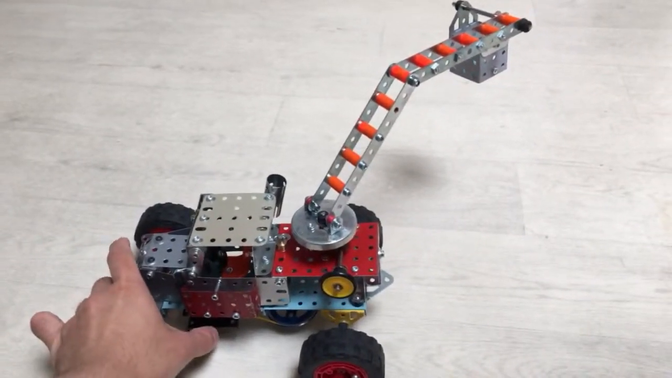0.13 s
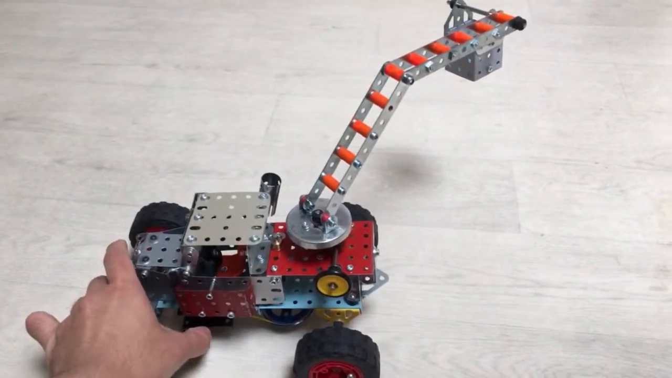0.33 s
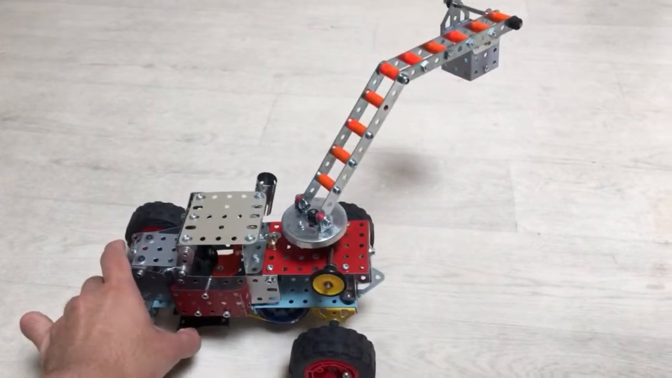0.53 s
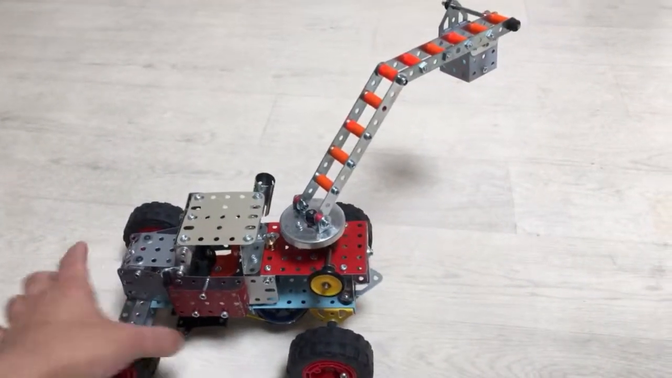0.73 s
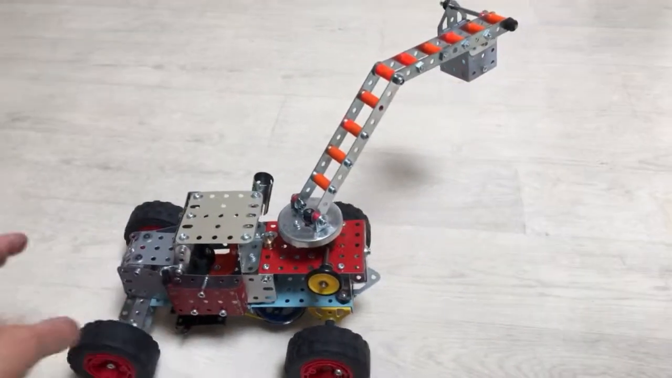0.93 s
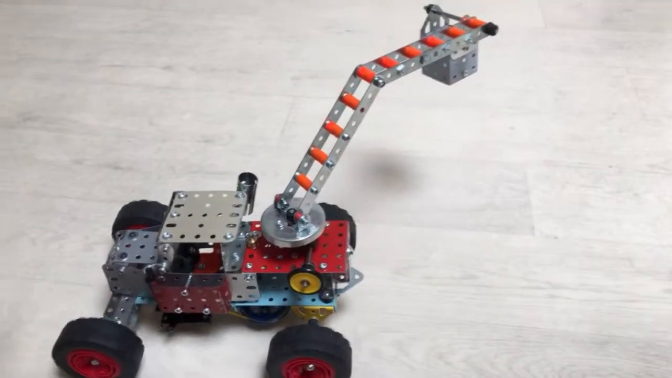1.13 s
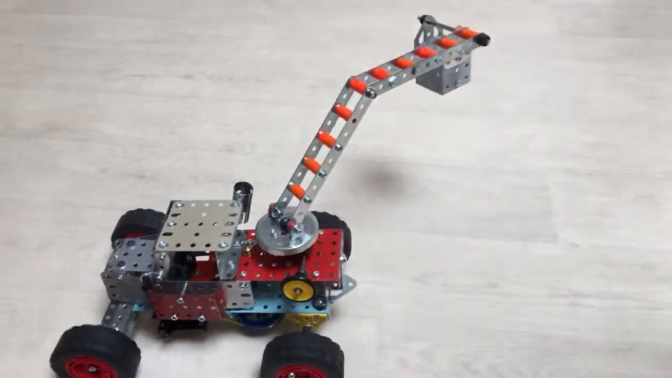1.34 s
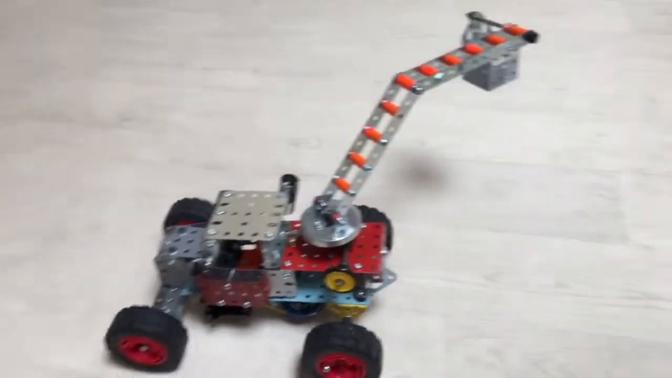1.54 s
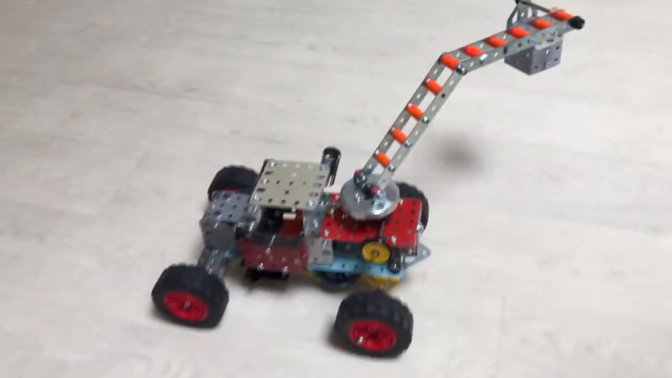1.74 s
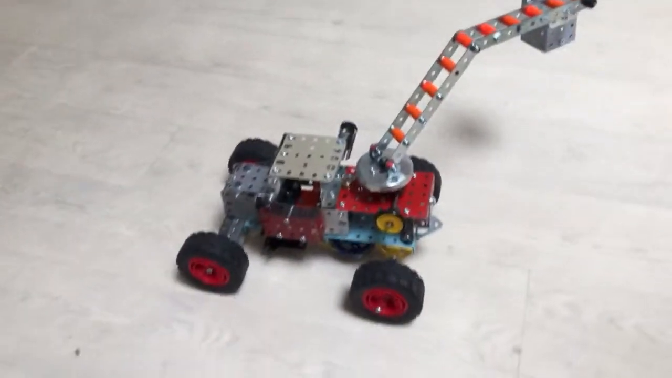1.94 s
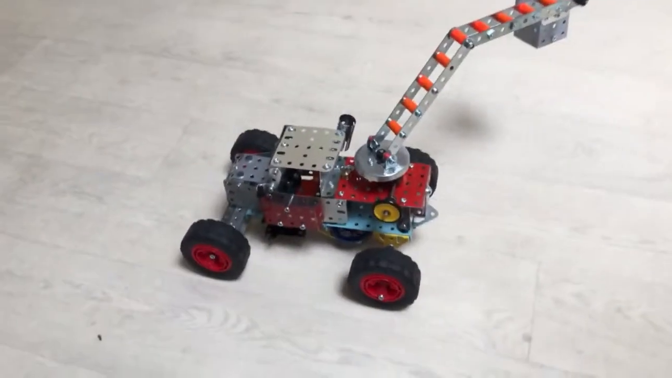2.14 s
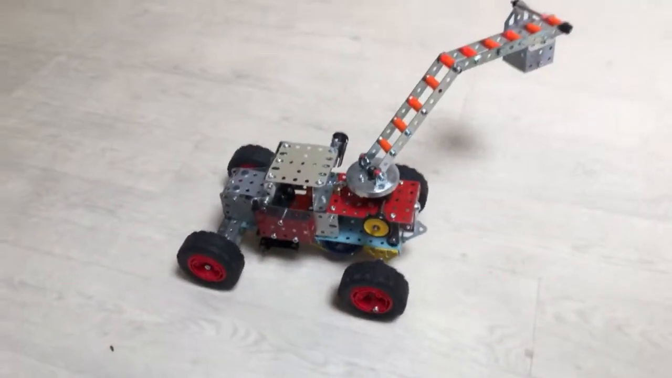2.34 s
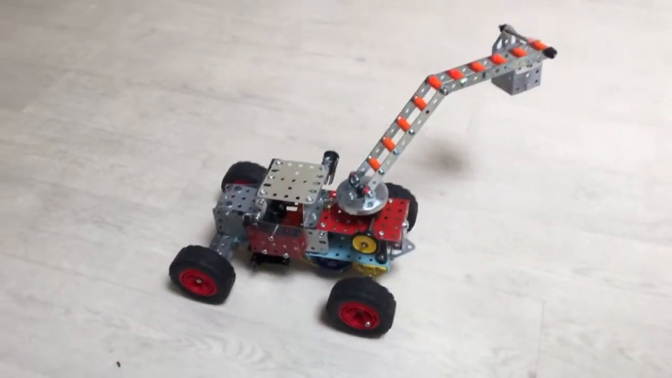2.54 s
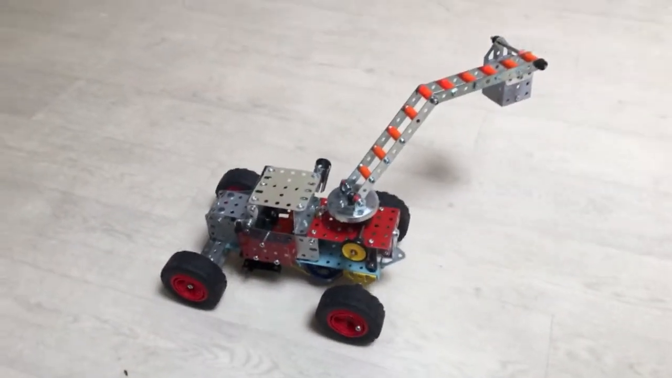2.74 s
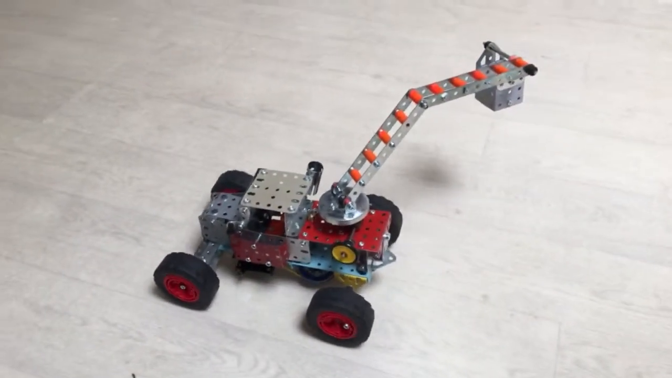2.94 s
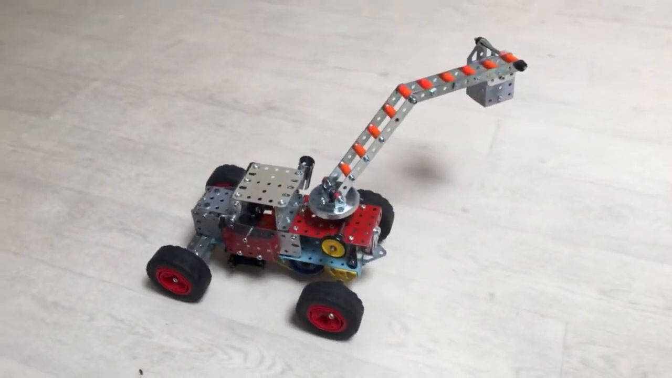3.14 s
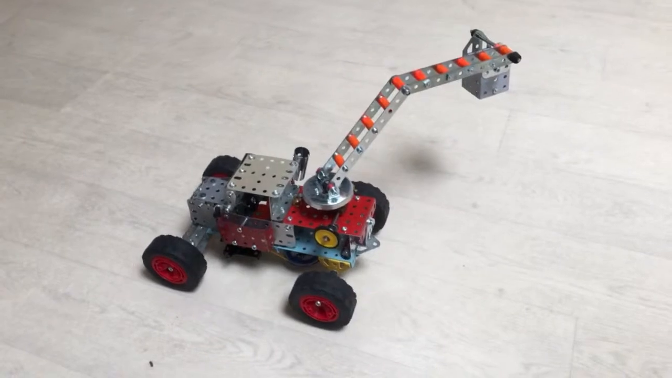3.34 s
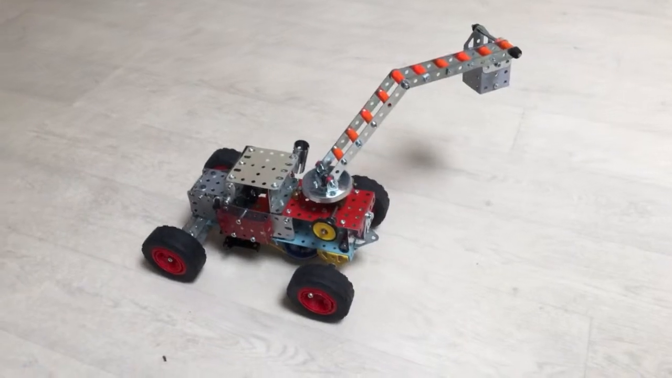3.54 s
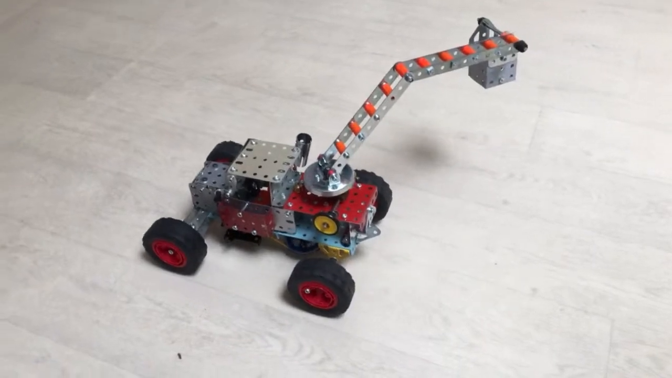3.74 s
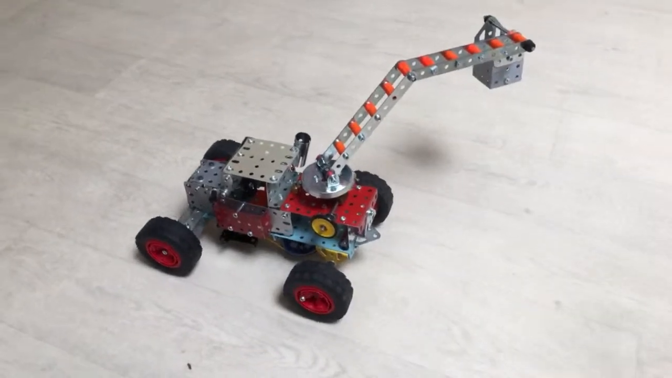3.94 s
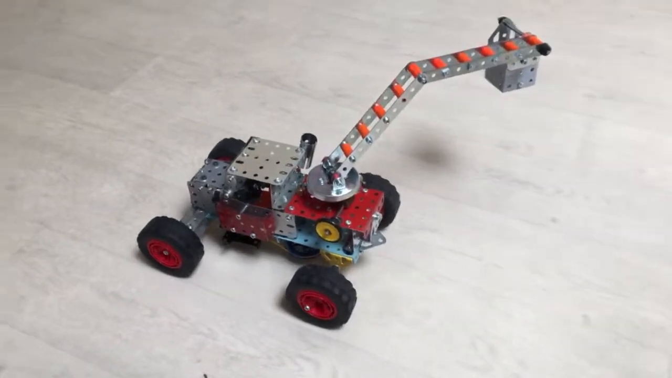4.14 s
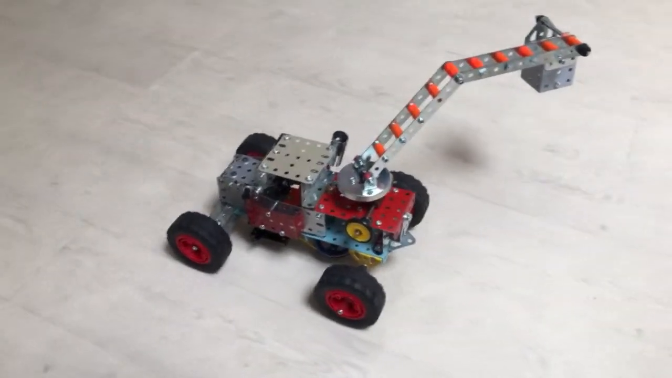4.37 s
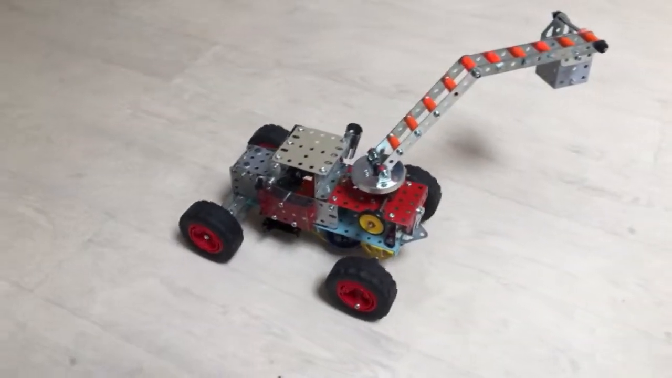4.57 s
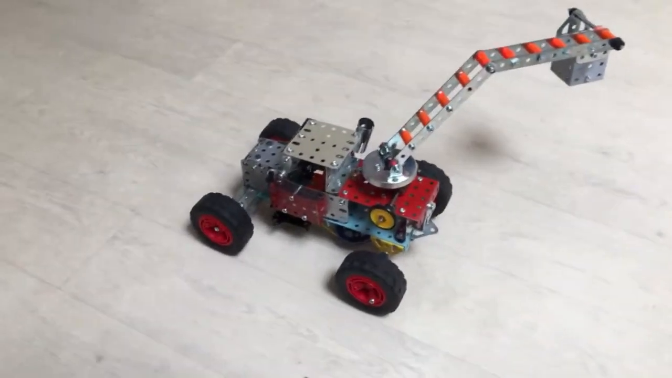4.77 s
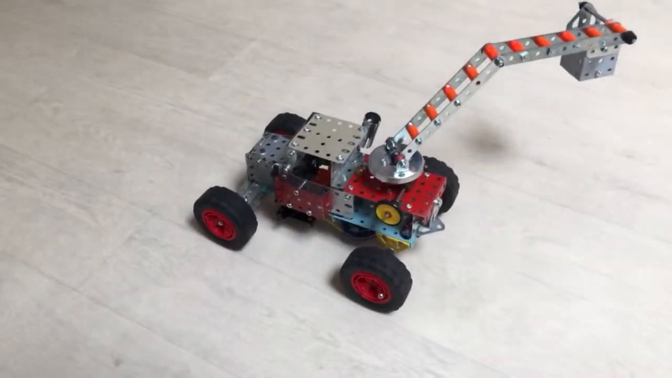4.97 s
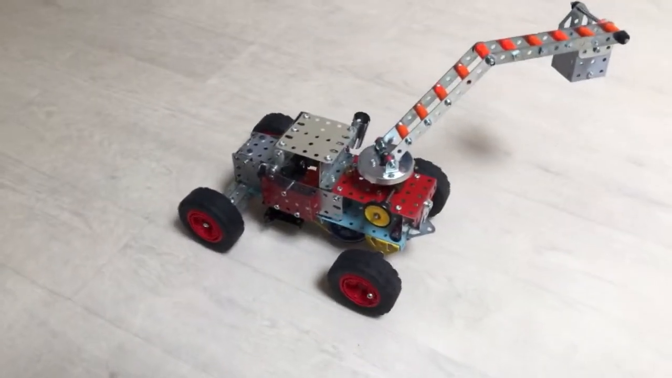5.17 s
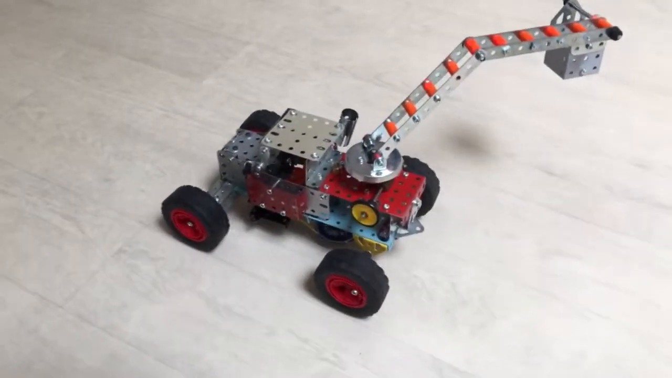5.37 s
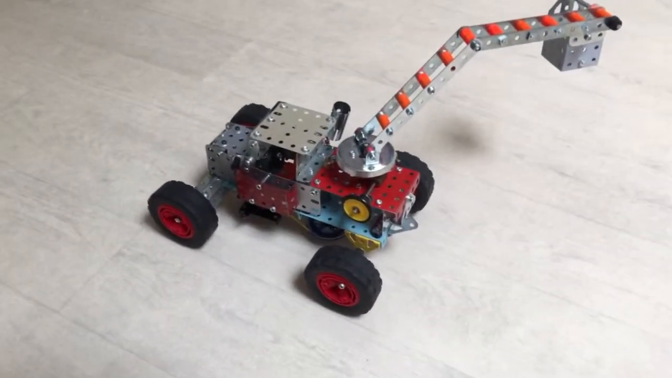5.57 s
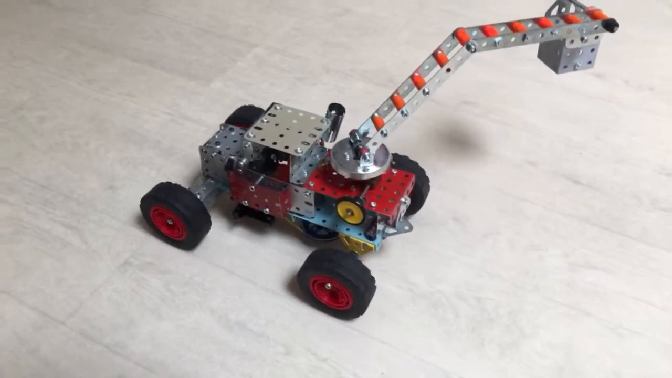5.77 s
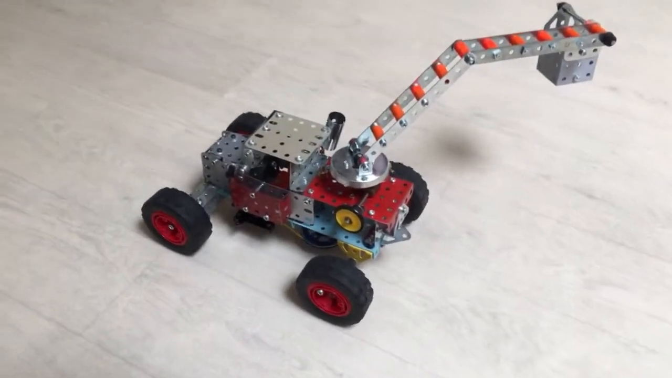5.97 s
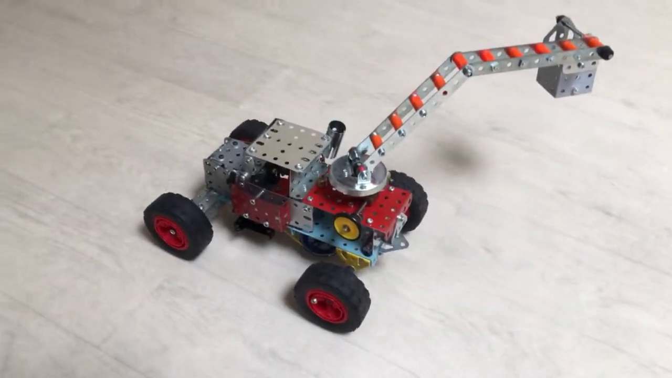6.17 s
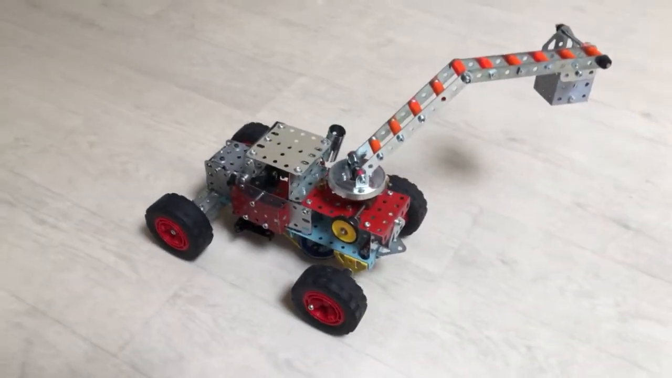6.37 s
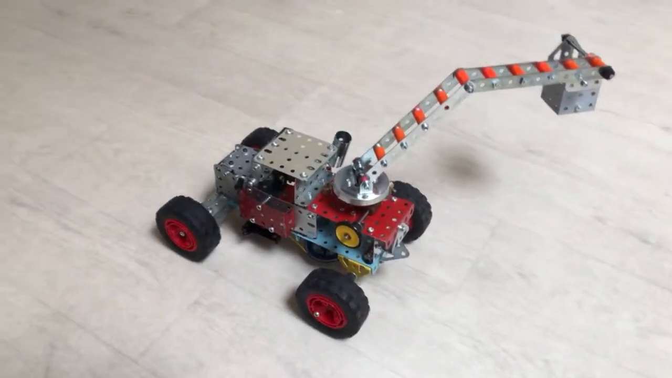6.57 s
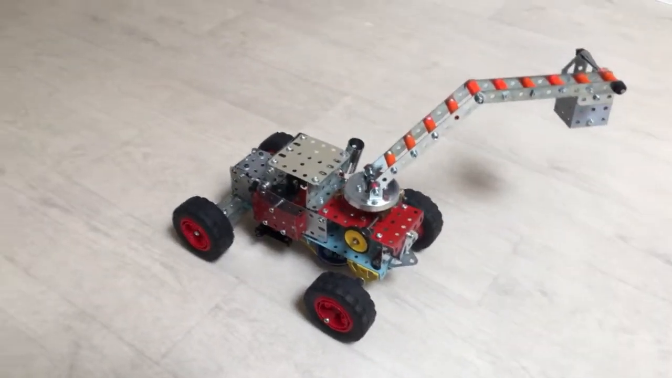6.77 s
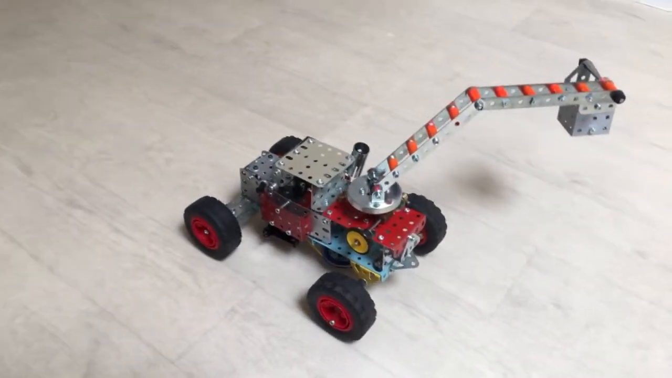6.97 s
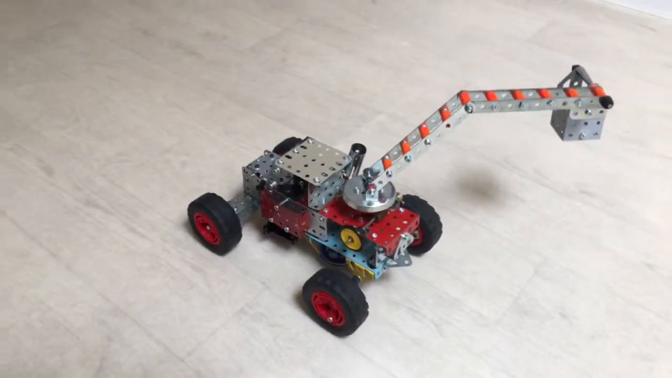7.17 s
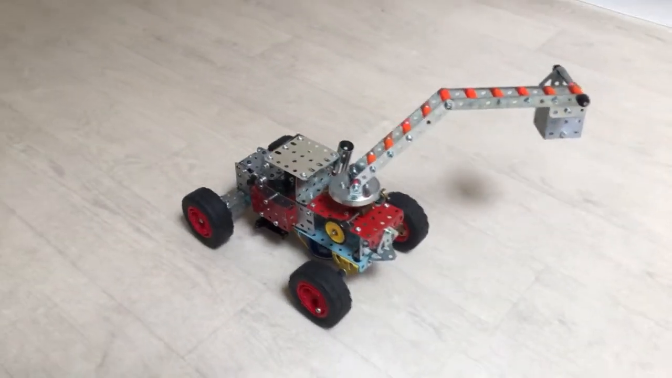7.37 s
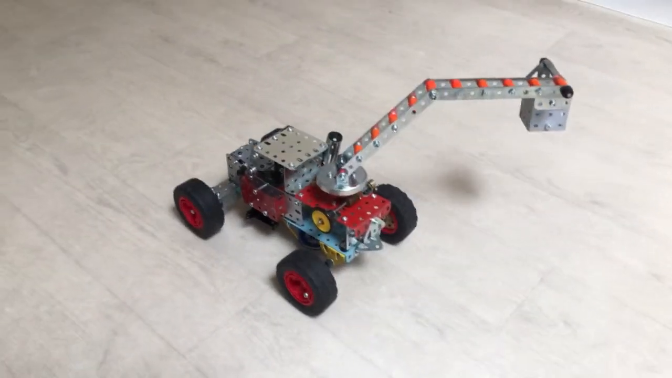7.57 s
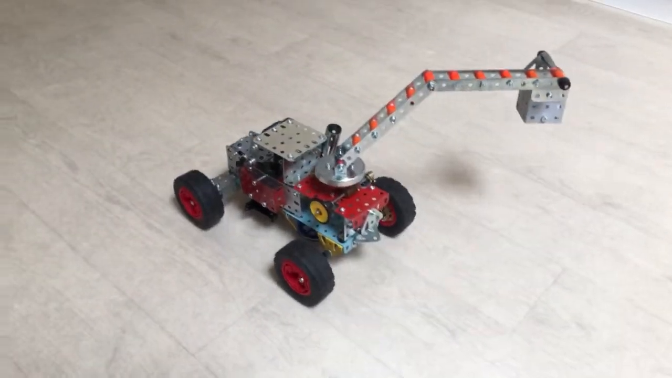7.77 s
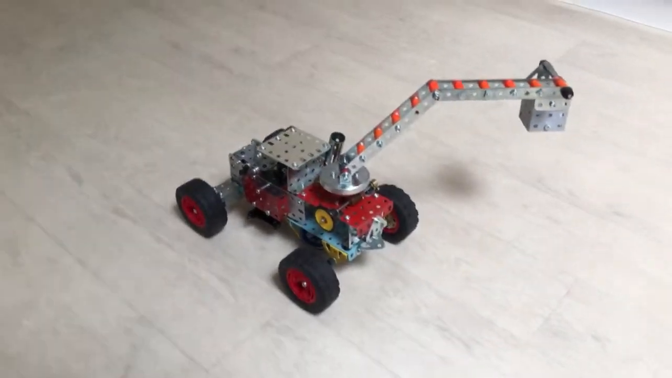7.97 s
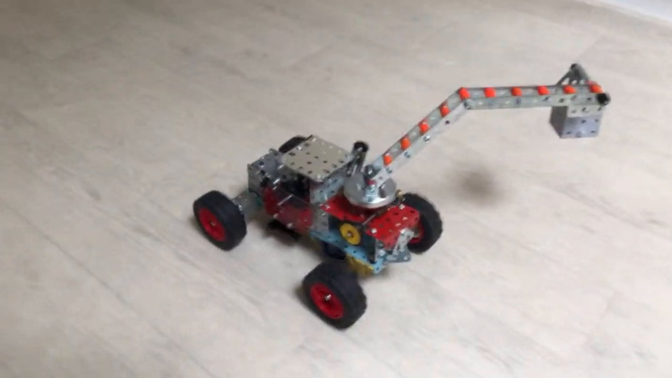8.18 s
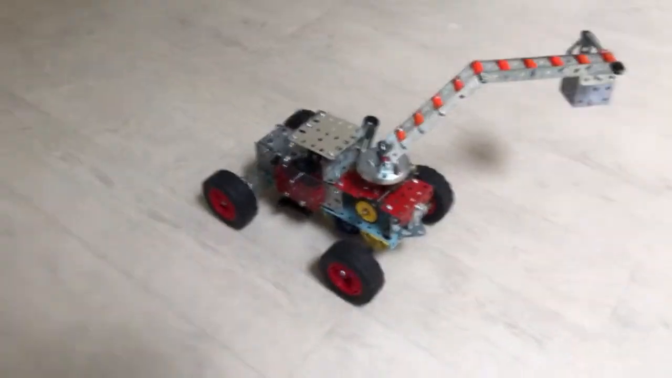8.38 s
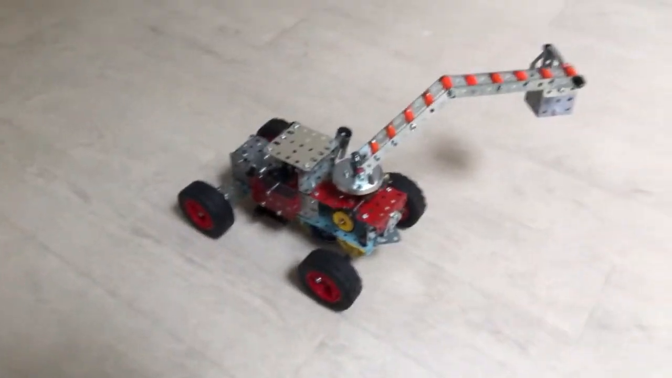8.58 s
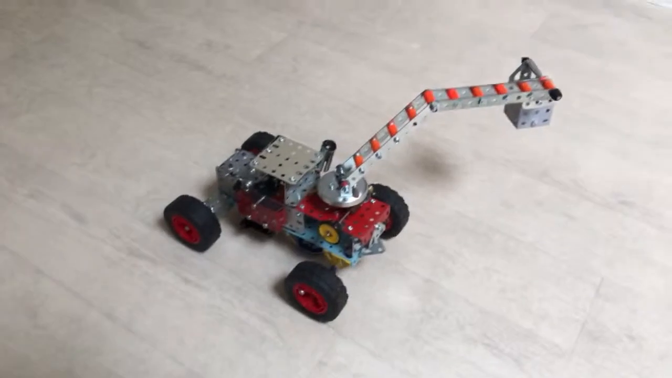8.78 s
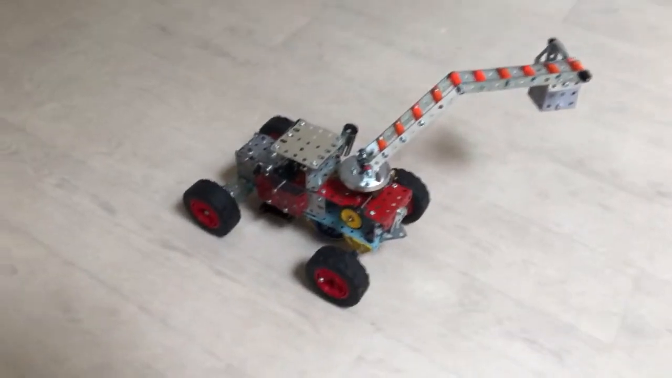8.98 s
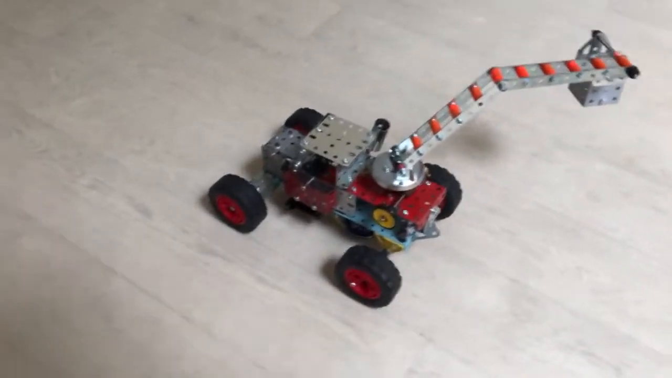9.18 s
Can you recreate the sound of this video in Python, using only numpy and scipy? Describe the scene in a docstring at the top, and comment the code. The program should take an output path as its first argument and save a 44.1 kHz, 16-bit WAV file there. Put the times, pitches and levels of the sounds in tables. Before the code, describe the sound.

After half a second of quiet room, a clockwork toy whirs into a steady tinny chatter with small clinks, faint squeaks and one late knock.

```python
"""A wind-up toy crane truck of bolted metal strips is let go and crawls over a hard floor in a room.
A six-toothed pinion on the fast shaft ticks into the frame, hardest once a turn, and sets sheets, plates and
small nuts chattering; plates and nuts grow louder with speed, and an off-centre wheel sways the load.
The gears hum, a strip rings, tyres rumble, slack parts clink and a dry axle squeaks now and then, over faint
room air. A faint soft scuff falls midway, a clear dull knock near the end."""
import sys
import numpy as np
from scipy import signal
from scipy.fft import rfft, irfft
from scipy.io import wavfile
from scipy.ndimage import uniform_filter1d

SR = 44100
rng = np.random.default_rng(int(sys.argv[2]) if len(sys.argv) > 2 else 0)


def inscribe(sig):
    """Save sig as 16-bit PCM at rate SR to the path in sys.argv[1].

    A 1-D sig is mono; a 2-D sig holds one channel per row.
    Samples are clipped to [-1, 1] before scaling.
    """
    pcm = np.round(np.clip(np.atleast_2d(sig).T, -1, 1) * 32767)
    wavfile.write(sys.argv[1], SR, pcm.astype(np.int16))


N = 406161
TIME = np.arange(N) / SR
RELEASE_S, CRUISE_HZ = .476, 66  # hand lets go; usual speed of the fast shaft (turns/s)


def undb(db):
    """Decibels to gain."""
    return 10 ** (np.asarray(db) / 20)


def unit(x):
    """Scale to rms 1."""
    return x / np.sqrt(np.mean(x ** 2))


def curves(table):
    """Columns of a time table, interpolated to every sample."""
    s, *columns = np.transpose(table)
    return [np.interp(TIME, s, column) for column in columns]


def walk(rate_hz):
    """Smooth random drift, rms 1."""
    hold = max(int(SR / rate_hz), 1)
    steps = np.repeat(rng.standard_normal(N // hold + 1), hold)
    return unit(uniform_filter1d(steps, hold)[:N])


def body(colour, modes=(), size=8192):
    """Minimum-phase impulse response: a broad colour times resonances."""
    hz = np.maximum(np.arange(size // 2 + 1) * SR / size, 1)
    points_hz, db = np.transpose(colour)
    gain = undb(np.interp(np.log(hz), np.log(points_hz), db))
    for centre_hz, width_hz, peak_db in modes:
        bell = 1 / (1 + (2 * (hz - centre_hz) / width_hz) ** 2)
        gain = gain * np.sqrt(1 + (undb(peak_db) ** 2 - 1) * bell)
    # folding the cepstrum makes the response causal
    cepstrum = irfft(np.log(gain))[:size // 2]
    cepstrum[1:] *= 2
    return irfft(np.exp(rfft(cepstrum, size)))


def ring(x, response):
    """Play x through an impulse response."""
    return signal.fftconvolve(x, response)[:N]


def resonate(shaking, hz, width_hz, flutter_db):
    """One part rings on at its own pitch (one-pole resonator), fluttering as the frame flexes."""
    pole = np.exp((2j * hz - width_hz) * np.pi / SR)
    tone = signal.lfilter([1, -1], [1, -pole], shaking).imag
    return unit(tone * undb(flutter_db * walk(35)))


def driven(speed_hz, db, db_per_hz):
    """Level (dB) of a part: db at the usual speed, plus db_per_hz for each extra turn a second."""
    return db + db_per_hz * (speed_hz - CRUISE_HZ)


def settling(start_db, settle_s):
    """Level offset (dB), largest at the release, dying away as the toy gets going."""
    return start_db * np.exp(-np.maximum(TIME - RELEASE_S, 0) / settle_s)


# room air, rumble: (frequency [Hz], relative density [dB/Hz])
AIR_COLOUR = [(25, -18), (60, -18), (130, -10.5), (220, -13.5), (330, -12.5), (450, -20), (900, -21.5),
              (1900, -25.5), (2800, -30), (6000, -35.5), (15000, -49)]
RUMBLE_COLOUR = [(20, -38), (35, -19), (50, -5), (66, 3), (82, -9), (100, -12), (130, -18.5), (250, -22.5),
                 (500, -45.5)]


def background(air_db=-71, rumble_db=-63.0, drone_hz=300, drone_db=-77):
    """Coloured noise for room air and a low, steady rumble, plus a soft phase-wavering drone."""
    air = unit(ring(rng.standard_normal(N), body(AIR_COLOUR)))
    rumble = unit(ring(rng.standard_normal(N), body(RUMBLE_COLOUR)))
    drone = unit(np.sin(2 * np.pi * drone_hz * TIME + walk(12)))
    return undb(air_db) * air + undb(rumble_db) * rumble + undb(drone_db) * drone


def chatter(teeth, force_db, scatter_db, late_s, settle_s, grain_db, rub_db):
    """Each tooth throws a part up; it lands a little late and settles in ever smaller contacts."""
    chance = rng.standard_normal((len(teeth), 2))
    late = (late_s * SR * np.abs(chance[:, 0])).astype(int)
    landing = np.clip(teeth + late, 0, N - 1)
    blows = np.bincount(landing, undb(force_db + scatter_db * chance[:, 1]), N)
    bounce = unit(signal.lfilter([1], [1, -np.exp(-1 / (settle_s * SR))], blows))
    grain = undb(grain_db * np.minimum(rng.standard_normal(N), 3))
    contacts = rng.standard_normal(N) * grain
    return contacts * (bounce + undb(rub_db))


# pinion teeth in order through one turn: (force [dB])
TOOTH_FORCE_DB = [7, -3.5, -5, -1.5, 6, 5.5]
# treble drift: (time [s], loose plates [dB], small nuts [dB], gear housing [dB])
TREBLE_DRIFT = [(.63, 1.5, 3, -5), (1, 0.9, 2.5, -1.5), (2.1, .3, 1.3, 3), (3.4, -1.5, 0, -1.5),
                (4.2, -0.1, 0.3, 0), (5.5, 1.2, 0.4, 1.5), (6.5, 0.5, -0.2, 1), (7, 0.5, -1, 0.5),
                (7.6, 1.9, -4.5, -3), (8.2, 0.5, -4.5, -4), (8.8, -1.5, -1, -.5)]
# part colours: (frequency [Hz], relative density [dB/Hz])
FRAME_COLOUR = [(100, -25), (290, -16), (390, -17.5), (480, -23.5), (750, -15), (1130, -10.5), (1280, -5),
                (1650, -6), (2300, -0.5), (2950, -6.5), (3500, -4), (4300, -9.5), (4900, -4.5),
                (6000, -11.5), (10000, -19.5)]
SHEET_COLOUR = [(3000, -30), (4600, -7.5), (5100, -6), (5400, 0), (5950, -2.5), (6500, 3.5), (7000, 2),
                (7800, -13), (11000, -23.5)]
PLATE_COLOUR = [(3000, -31.5), (6400, -18.5), (7200, -4), (7700, 1), (8100, 0), (8900, 3), (9700, -7),
                (10500, -8.5), (12500, -13), (16000, -25)]
NUT_COLOUR = [(5000, -33.5), (10400, -13), (11100, -5.5), (11600, -1), (12100, 3), (12350, 1.5), (12800, 4),
              (13500, 6.5), (14600, 0), (16000, -2)]
# resonances on those colours: (frequency [Hz], width [Hz], height [dB])
FRAME_RESONANCES = [(538, 25, 7), (818, 25, 2), (1860, 26, 2.5), (2070, 49, -1), (2459, 58, 6.5),
                    (2630, 26, 6), (3383, 112, 8), (3580, 62, 4.5), (4143, 49, 9.5), (5100, 80, 2),
                    (5470, 120, 5)]
PLATE_RESONANCES = [(7790, 200, 2.2), (8200, 110, 5.3)]
WHEEL_RATIO, WHEEL_START_TURNS = .182, .779  # wheel turns per shaft turn; wheel phase


def gearbox(speed_hz, turns, sway_db=1.5, sheets_fade_db_per_s=0.74, bracket_swing=3.4):
    """Tooth blows shake the frame and rattle lighter parts, each bouncing in its own way."""
    tooth = np.floor(turns * len(TOOTH_FORCE_DB)).astype(int)
    teeth = np.flatnonzero(np.diff(tooth)) + 1
    # the off-centre wheel presses the teeth together once per wheel turn
    sway = np.cos(2 * np.pi * (WHEEL_RATIO * turns[teeth] + WHEEL_START_TURNS))
    force_db = np.array(TOOTH_FORCE_DB)[tooth[teeth] % len(TOOTH_FORCE_DB)] + sway_db * sway

    frame = chatter(teeth, 0.47 * force_db, scatter_db=4, late_s=.0012, settle_s=0.0034,
                    grain_db=5, rub_db=-2.5)
    gears = chatter(teeth, 0.45 * force_db, scatter_db=2.0, late_s=.001, settle_s=.0016,
                    grain_db=3, rub_db=-11)
    sheets = chatter(teeth, 0.39 * force_db, scatter_db=2.5, late_s=.0005, settle_s=0.002,
                     grain_db=3, rub_db=-7.5)
    plates = chatter(teeth, 0.72 * force_db, scatter_db=3.0, late_s=.0005, settle_s=0.0027,
                     grain_db=2.5, rub_db=-11.5)
    nuts = chatter(teeth, 0.51 * force_db, scatter_db=2.5, late_s=.0004, settle_s=0.0012,
                   grain_db=3.8, rub_db=-13)

    plates_drift_db, nuts_drift_db, housing_drift_db = curves(TREBLE_DRIFT)
    frame_db = driven(speed_hz, db=-43.5, db_per_hz=-0.03)
    # thin sheets are jolted by the start and calm down over the run
    sheets_db = driven(speed_hz, db=-41.0, db_per_hz=-0.05) + settling(start_db=4, settle_s=0.28)
    sheets_db = sheets_db - sheets_fade_db_per_s * (TIME - RELEASE_S)
    plates_db = driven(speed_hz, db=-38.5, db_per_hz=0.14) + plates_drift_db
    nuts_db = driven(speed_hz, db=-36.0, db_per_hz=0.1) + nuts_drift_db
    rattle = undb(frame_db) * unit(ring(frame, body(FRAME_COLOUR, FRAME_RESONANCES)))
    rattle = rattle + undb(sheets_db) * unit(ring(sheets, body(SHEET_COLOUR)))
    rattle = rattle + undb(plates_db) * unit(ring(plates, body(PLATE_COLOUR, PLATE_RESONANCES)))
    rattle = rattle + undb(nuts_db) * unit(ring(nuts, body(NUT_COLOUR)))

    # three parts ring clear: gear housing, bracket among the plates, washer among the nuts
    housing_db = driven(speed_hz, db=-48.5, db_per_hz=0.27) + housing_drift_db
    bracket_db = driven(speed_hz, db=-50, db_per_hz=0.0) + bracket_swing * plates_drift_db
    washer_db = driven(speed_hz, db=-38, db_per_hz=.3) + nuts_drift_db
    washer_db = washer_db + settling(start_db=-24, settle_s=1.2)  # slowly shakes itself free
    housing = undb(housing_db) * resonate(gears, hz=3492, width_hz=195, flutter_db=1.5)
    bracket = undb(bracket_db) * resonate(plates, hz=7900, width_hz=150, flutter_db=3.5)
    washer = undb(washer_db) * resonate(nuts, hz=15300, width_hz=460, flutter_db=1.0)
    return rattle + housing + bracket + washer


# gear-mesh hum at the usual speed: (time [s], level [dB])
MESH_LEVEL = [(.7, -67), (1.6, -67), (2.5, -69.5), (3, -65.5), (4.4, -67), (5.7, -69), (6.4, -75),
              (9.2, -74)]
# gear-train tones: (multiple of shaft speed), (relative level [dB])
TONE_ORDERS = [6, 8, 11, 12, 14, 15]
TONE_DB = [-2.5, -10.5, -7.5, -7, -5, -12]


def hum(speed_hz, turns, brighten_db_per_s=.7):
    """Meshing teeth sing wavering shaft-speed multiples; each octave gains on the one below over the run."""
    tilt_db = brighten_db_per_s * (TIME - TIME.mean())
    tones = np.zeros(N)
    for order, db in zip(TONE_ORDERS, TONE_DB):
        octaves = np.log2(order / TONE_ORDERS[0])
        tone_db = db + tilt_db * octaves + 2 * walk(20)
        phase = 2 * np.pi * order * turns + 0.32 * walk(25)
        tones += undb(tone_db) * np.sin(phase)
    return undb(driven(speed_hz, curves(MESH_LEVEL)[0], db_per_hz=0.87)) * unit(tones)


def strip(speed_hz):
    """One long strip, fed by noise for the shaking, rings on in a narrow resonance."""
    tone = resonate(rng.standard_normal(N), hz=1892, width_hz=16, flutter_db=3)
    return undb(driven(speed_hz, db=-66, db_per_hz=0.7)) * tone


# rolling tyres: (time [s], level [dB])
ROLL_LEVEL = [(.5, -76), (2.2, -66.5), (4, -66.5), (5.2, -63), (5.6, -73), (6.7, -63.5), (8.1, -62.5),
              (9.2, -66)]
# tyre colour: (frequency [Hz], relative density [dB/Hz])
TYRE_COLOUR = [(20, -26), (40, -2), (55, -5), (80, 0), (110, -6), (170, -11.5), (300, -20), (450, -35),
               (900, -49)]


def tyres():
    """Rubber wheels rumble softly on the boards: low coloured noise."""
    return undb(curves(ROLL_LEVEL)[0]) * unit(ring(rng.standard_normal(N), body(TYRE_COLOUR)))


# timed clicks and clinks, a faint click at the release, then clinks of slack parts:
# (time [s], peak before trim [dB])
CLINK_HITS = [(0.4818, -34), (0.63, -15), (0.6744, -17), (0.9213, -20), (1.4531, -17), (1.5439, -17),
              (1.7794, -14), (1.8497, -16), (2.5017, -16), (2.578, -16), (3.6591, -16), (3.7643, -14),
              (4.355, -15), (4.7925, -16), (5.4475, -16), (5.7234, -14), (6.1744, -15), (6.3495, -17),
              (8.4327, -17), (8.7999, -21)]


def clinks(settle_s=0.0015, trim_db=-1, plates_db=-4, nuts_db=-3,
           small_db=-21, scatter_db=1.8, count=20, size=1024):
    """Contacts as decaying noise bursts ring plates and nuts, at set times; small clinks fall at random."""
    out = np.zeros(N + size)
    plates = undb(plates_db) * body(PLATE_COLOUR, PLATE_RESONANCES)[:size]
    nuts = undb(nuts_db) * body(NUT_COLOUR)[:size]
    small_s = rng.uniform(CLINK_HITS[0][0], TIME[-1], count)
    small_peak_db = small_db + scatter_db * rng.standard_normal(count)
    decay = np.exp(-np.arange(size) / (settle_s * SR))
    for s, peak_db in [*CLINK_HITS, *zip(small_s, small_peak_db)]:
        contacts = rng.standard_normal(size) * decay
        clink = signal.fftconvolve(contacts, plates + nuts)[:size]
        start = int(s * SR)
        out[start:start + size] += undb(peak_db + trim_db) * clink / np.abs(clink).max()
    return out[:N]


# dry-axle squeaks: (time of maximum [s], length [s], level [dB])
SQUEAK_SWELLS = [(.71, .06, -53), (1.833, .08, -57), (3.77, .07, -55), (4.37, .12, -55),
                 (4.672, 0.085, -46.5), (5.35, .14, -52), (5.62, .16, -53.5), (5.8, 0.18, -52.5),
                 (6.36, 0.11, -52), (6.54, .14, -53), (7.12, 0.12, -53), (7.46, .14, -56), (7.8, .16, -57)]


def squeak(hz=1890, waver_rad=1.5, flutter_db=1.5):
    """A dry axle sings at one pitch; each squeak swells and fades, wavering as it grips and slips."""
    swell = np.zeros(N)
    for s, length_s, db in SQUEAK_SWELLS:
        swell += undb(db) * np.exp(-2 * np.pi * ((TIME - s) / length_s) ** 2)
    phase = 2 * np.pi * hz * TIME + waver_rad * walk(40)
    return swell * undb(flutter_db * walk(45)) * np.sqrt(2) * np.sin(phase)


# soft scuff, dull knock: (time [s], direct-sound peak [dB])
SCUFF_AND_KNOCK_HITS = [(4.388, -38), (8.3362, -23)]
# their shared colour: (frequency [Hz], relative density [dB/Hz])
DULL_COLOUR = [(120, -26), (280, -2.5), (450, -3.5), (650, -0.5), (900, 0), (1150, 0.5), (1600, 2),
               (1900, -23), (3000, -39)]


def scuff_and_knock():
    """Soft scuff and dull knock: impulses through one short response weak in treble."""
    impulses, response = np.zeros(N), body(DULL_COLOUR)
    for s, db in SCUFF_AND_KNOCK_HITS:
        impulses[int(s * SR)] = undb(db)
    return ring(impulses, response / np.abs(response).max())


def room(x, wet_db, t60_s, damp_hz, gap_s=0.0056):
    """Direct sound plus a diffuse tail, exponentially decaying noise duller than its source."""
    t = TIME[:SR // 2]
    tail = rng.standard_normal(len(t)) * np.exp(-np.log(1000) * t / t60_s) * (t > gap_s)
    damping = signal.butter(1, min(damp_hz, SR / 3), fs=SR, output="sos")
    tail = signal.sosfilt(damping, tail / np.linalg.norm(tail))
    return x + undb(wet_db) * ring(x, tail)


# fast shaft: (time [s], speed [turns/s])
SHAFT_SPEED = [(0.47, 0), (0.55, 57.83), (0.74, 68.7), (1.06, 54.91), (1.34, 67.56), (2.08, 69.08),
               (2.55, 64.49), (3.27, 68.44), (3.42, 66.35), (4.7, 68.82), (5.99, 69.0), (6.11, 67.42),
               (6.54, 69.55), (7.01, 61.44), (7.57, 65.12), (8.22, 64.34), (8.84, 58.09), (9.2, 65.92)]
SHAFT_START_TURNS = .869


def scene(held_db=-13, take_up_s=0.078):
    """The hand lets go, the gears take up the load and the motor runs."""
    speed_hz = curves(SHAFT_SPEED)[0]
    turns = SHAFT_START_TURNS + np.cumsum(speed_hz) / SR
    load = np.clip((TIME - RELEASE_S) / take_up_s, 0, 1)
    running = (TIME > RELEASE_S) * undb(held_db * (1 - load))
    toy = room(running * gearbox(speed_hz, turns) + clinks(), wet_db=-8, t60_s=0.24, damp_hz=6000)
    undertones = running * (hum(speed_hz, turns) + strip(speed_hz) + squeak() + tyres())
    dull = room(scuff_and_knock(), wet_db=-4, t60_s=.36, damp_hz=3000, gap_s=.012)
    return (toy + undertones + dull + background())[None]


def record(dry, top_hz=15750):
    """The recorder cuts the top: steep elliptic low-pass."""
    return signal.sosfilt(signal.ellip(12, .1, 75, top_hz, fs=SR, output="sos"), dry)


dry = scene()
out = record(dry)
inscribe(out)
```